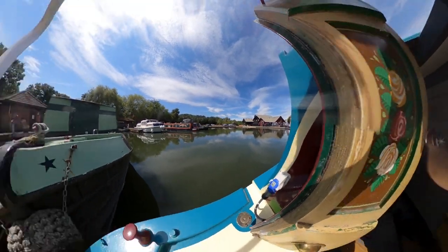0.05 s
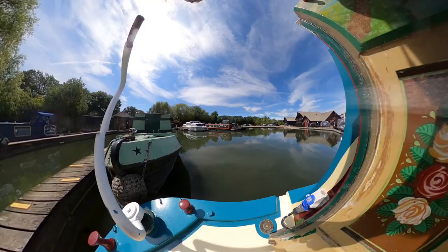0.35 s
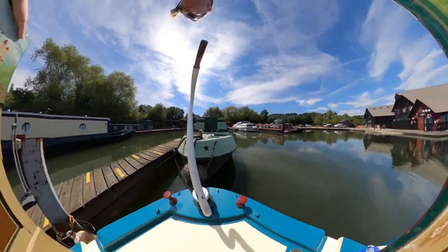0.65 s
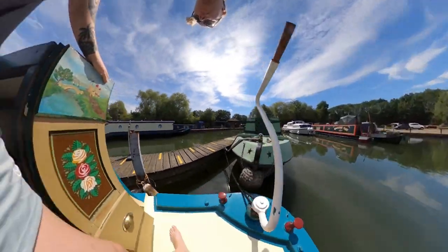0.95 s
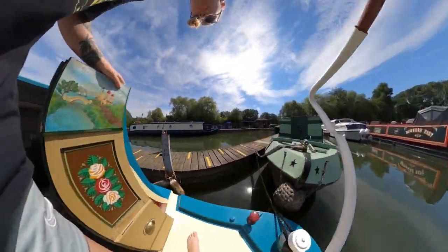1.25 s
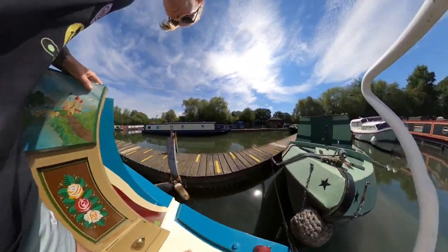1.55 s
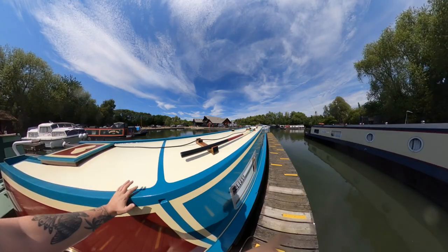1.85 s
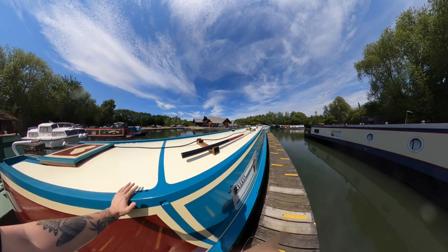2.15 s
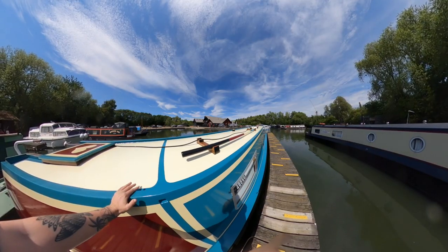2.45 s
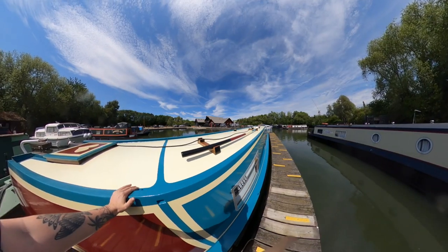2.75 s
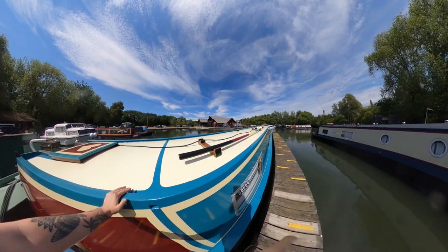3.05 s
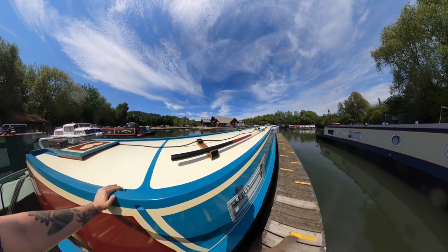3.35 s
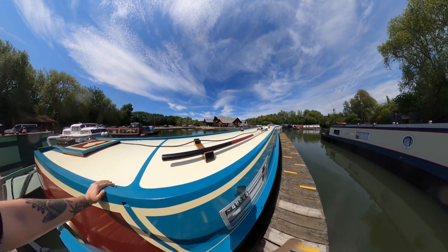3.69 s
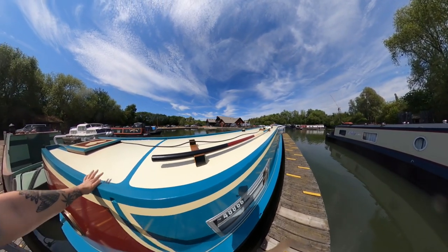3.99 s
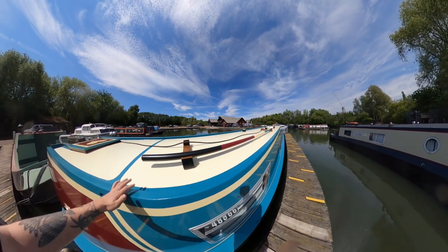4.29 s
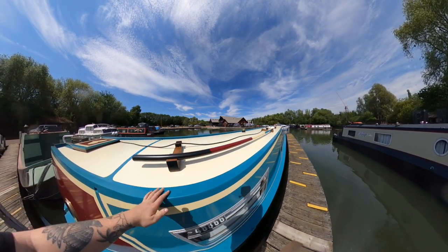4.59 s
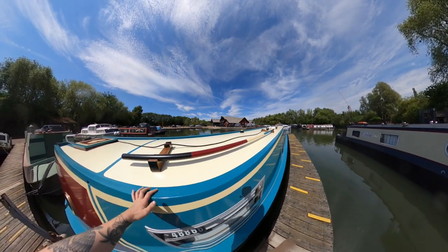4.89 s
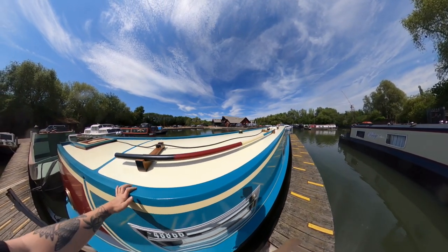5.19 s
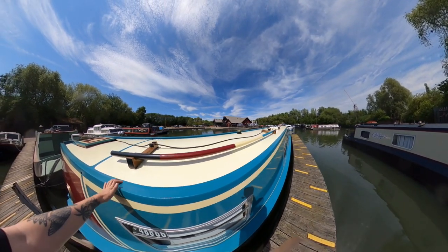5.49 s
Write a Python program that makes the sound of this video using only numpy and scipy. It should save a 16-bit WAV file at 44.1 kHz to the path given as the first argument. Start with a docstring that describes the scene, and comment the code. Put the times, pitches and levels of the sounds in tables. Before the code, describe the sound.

Wind rumbles on the microphone aboard a moored boat, over a soft wash of water and leaves. Close by, the hull takes a knock, and a wooden door clicks several times and squeaks once. A low idling engine hum comes up, and a small dog gives five short, hoarse yaps that echo across the water. Light handling bumps, scuffs and faint distant chirps fall between them.

```python
"""On a narrowboat in a marina, camera in hand. Wind and handling rumble on the microphone
over a wash of water and trees. Close by, the hull takes a knock, and a cabin door clicks and
squeaks once as its hinge sticks and slips. The hum of an idling boat engine, faint at first,
comes up abruptly, and a small dog yaps five times across the water, echoing off hulls and the
far bank. Between the later yaps, faint calls carry from far off."""
import sys
import numpy as np
from scipy import signal
from scipy.fft import rfft, irfft, next_fast_len
from scipy.io import wavfile
from scipy.ndimage import uniform_filter1d, map_coordinates

SR = 44100
rng = np.random.default_rng(int(sys.argv[2]) if len(sys.argv) > 2 else 0)


def wrap_up_sound(samples):
    """Save the sound to the file named by the first command line argument, as 16-bit audio."""
    columns = np.atleast_2d(samples).T
    # keep every value between -1 and 1, then stretch to whole-number steps
    tamed = np.clip(columns, -1, 1)
    steps = np.round(tamed * 32767).astype(np.int16)
    wavfile.write(sys.argv[1], SR, steps)


N = 243873
TIME = np.arange(N) / SR


def amp(db):
    """Decibels to gain."""
    return 10 ** (np.asarray(db) / 20)


def unit(x):
    """x scaled to rms 1."""
    return x / np.sqrt(np.mean(x ** 2) + 1e-20)


def ramp(x, length):
    """Rises from 0 to 1 as x goes from 0 to length."""
    return np.clip(x / length, 0, 1)


def curves(rows):
    """Each column after the first (time_s), joined by straight lines."""
    times, *columns = np.transpose(rows)
    return [np.interp(TIME, times, column) for column in columns]


def wobble(rate, size=N):
    """A smooth random curve with rate knots a second."""
    knots = rng.standard_normal(size // 8 + 8)
    return map_coordinates(knots, [np.arange(size) * rate / SR], mode="wrap")


def filtered(x, response):
    """x through a gain that depends on frequency."""
    size = next_fast_len(len(x) + 8192)
    return irfft(rfft(x, size) * response(np.fft.rfftfreq(size, 1 / SR)), size)[:len(x)]


def lowpass(x, hz, steepness=4):
    """x with its treble rolled off above hz."""
    return filtered(x, lambda f: 1 / (1 + (f / hz) ** steepness))


def coloured(x, points):
    """x through a curve of (freq_hz, gain_db) points, at rms 1."""
    hz, db = np.transpose(points)
    return unit(filtered(x, lambda f: amp(np.interp(np.log(f + 1), np.log(hz), db))))


def resonate(x, modes):
    """x through resonances of alternating sign: (centre_hz, width_hz, gain_db)."""
    return filtered(x, lambda f: sum(
        (-1) ** k * amp(db) * 1j * f * width / (hz * hz - f * f + 1j * f * width)
        for k, (hz, width, db) in enumerate(modes)))


def noise(points, size=N):
    """Coloured noise of rms 1."""
    return coloured(rng.standard_normal(size), points)


def patchy(x, depth_db, bands, frames):
    """x with random swells, each a few bands wide and a few frames long."""
    spectrum = signal.stft(x, nperseg=512)[2]
    swells = uniform_filter1d(rng.standard_normal(spectrum.shape), bands, 0)
    swells = unit(uniform_filter1d(swells, frames, 1))
    return signal.istft(spectrum * amp(depth_db * swells), nperseg=512)[1][:len(x)]


def add(track, start_s, sound):
    """Mix a sound into the track at start_s."""
    start = round(start_s * SR)
    sound = sound[max(-start, 0):]
    part = track[max(start, 0):][:len(sound)]
    part += sound[:len(part)]


def echoes(x, t60_s, gap_s):
    """Diffuse reflections, about as strong as x, that begin after a gap."""
    t = TIME[:SR // 2]
    tail = rng.standard_normal(len(t)) * amp(-60 * t / t60_s) * (t > gap_s)
    return signal.fftconvolve(x, tail / np.linalg.norm(tail))[:len(x)]


def buzz(hz, rough, jitter, jitter_rate, uneven, harmonics):
    """Pulses at a pitch, every third one stronger, mixed with noise that puffs once a cycle."""
    phase = 2 * np.pi * np.cumsum(hz * (1 + jitter * wobble(jitter_rate, len(hz)))) / SR
    pulses = sum(np.cos(k * phase) for k in range(1, harmonics + 1)) * np.sqrt(4 * hz / SR)
    pulses *= 1 + uneven * np.cos(phase / 3)
    puffs = unit(rng.standard_normal(len(hz)) * (1 + np.cos(phase)))
    return np.sqrt(1 - rough) * pulses + np.sqrt(rough) * puffs


def thump(hz, db, t60_s, sharpness):
    """A damped swing; more sharpness gives it a quicker start."""
    t = TIME[:SR // 3]
    onset = 1 - np.exp(-(sharpness * hz * t) ** 2)
    return amp(db - 60 * t / t60_s) * onset * np.sin(2 * np.pi * hz * t)


def wind():
    """Wind right on the microphone: slow gusty buffets and a lumpy rumble of eddies."""
    # course of the wind: time_s, relative_buffet_db, relative_rumble_db
    strength = [(0.0, -22, -23), (.2, -26.5, -33.5), (.45, -18, -27.5), (0.91, -18.5, -30),
                (1.49, -23, -30.5), (2.8, -14, -30), (3.53, -17, -30.5), (4.13, -14.5, -30.5),
                (4.47, -16.5, -30.5), (5.53, -12, -29)]
    # spectra of the two layers: freq_hz, gain_db
    buffet_colour = [(3, -22), (8, 1.5), (15, 8.5), (22, 12.5), (37, 12), (48, 4), (70, -5), (140, -69.5)]
    rumble_colour = [(40, -28), (72, 1.5), (95, -3.5), (125, -9), (185, -11.5), (330, -23.5), (600, -45.5),
                     (1300, -100)]
    buffet_db, rumble_db = curves(strength)
    gust_db = wobble(rate=4.5)
    buffets = amp(buffet_db + 3.5 + gust_db) * noise(buffet_colour)
    eddies = sum(noise(rumble_colour) * amp(3 * wobble(rate=22)) for _ in range(2))
    return buffets + amp(rumble_db + 5.5) * unit(eddies)


def marina():
    """All around, ripples and leaves make a restless wash under a fine hiss."""
    # course of the ambience: time_s, relative_wash_db, relative_hiss_db
    ambience = [(0.12, -46.5, -58), (1.59, -42.5, -49.5), (1.76, -41, -55), (2.39, -37, -51.5),
                (2.93, -40.5, -54), (3.57, -35.5, -49), (4.35, -40.5, -53), (4.48, -38.5, -49.5),
                (5.15, -40, -52)]
    # spectra of the two layers: freq_hz, gain_db
    wash_colour = [(220, -9), (400, 2.5), (830, -8), (1080, -2.5), (1600, -6.5), (2100, -8), (2900, -16.5),
                   (4200, -28), (7000, -67)]
    hiss_colour = [(2000, -31.5), (3300, -1), (4100, -2), (5200, 3.5), (6200, 0), (7600, -0.5),
                   (8200, -6.5), (9000, -14), (11500, -58.5)]
    wash_db, hiss_db = curves(ambience)
    wash = patchy(noise(wash_colour), depth_db=2.5, bands=6, frames=10)
    wash *= amp(1.2 * wobble(rate=90))
    hiss = noise(hiss_colour) * amp(hiss_db - 1.5 + 1.4 * wobble(rate=24.99))
    return unit(wash) * amp(wash_db + 1.5) + hiss


def engine():
    """An idling engine's firing tone and weaker machinery tones: faint, then abruptly louder."""
    # engine tones: firing_multiple, relative_db
    partials = [(1, 2), (1.6, -19.5), (1.79, -13.5), (2.7, -28.5)]
    firing_hz, waver_db = 63.04, 3.3
    faint_db, full_db, hum_rises_s, rise_length_s = -31.5, -15, 1.65, 0.087
    hum_db = faint_db + (full_db - faint_db) * ramp(TIME - hum_rises_s, rise_length_s)
    phase = 2 * np.pi * firing_hz * TIME
    hum = np.zeros(N)
    for multiple, db in partials:
        level = amp(db + waver_db * wobble(rate=8.7))
        hum += level * np.sin(multiple * (phase + 0.22 * wobble(rate=6.9)))
    return amp(hum_db) * unit(hum)


def scuffs():
    """Hand and shoes rub on boat and jetty: grainy noise swells and fades in a broad resonance."""
    # rubs: start_s, length_s, relative_db, centre_hz, width_hz
    rubs = [(-.04, 0.17, -36.5, 880, 1300), (0.363, 0.027, -33, 1080, 890), (0.395, 0.098, -41, 1350, 910),
            (1.529, 0.15, -49, 5500, 3500), (1.977, 0.32, -52, 5200, 1990), (2.075, 0.06, -37.5, 514, 200),
            (2.47, 0.15, -37, 495, 220), (2.546, 0.15, -40, 1550, 900), (2.96, 0.13, -35.5, 490, 280),
            (3.335, 0.07, -36.5, 1500, 810), (3.885, 0.075, -38, 2400, 1800),
            (4.769, 0.1, -38.5, 1250, 990), (4.804, 0.077, -33, 420, 261), (5.135, 0.043, -44, 4000, 1200)]
    out = np.zeros(N)
    for start_s, length_s, db, hz, width_hz in rubs:
        size = int(length_s * SR)
        grain = rng.standard_normal(size) * amp(2.5 * wobble(200, size))
        body = [(hz, width_hz, 0)]
        rub = unit(resonate(resonate(grain, body), body))
        add(out, start_s, amp(db + 1.5) * rub * np.hanning(size))
    return out


def door_clicks():
    """Close by, each contact rings the wooden door and rattles its fittings, with one rebound."""
    # contacts of door, fittings and hand: start_s, panel_db, panel_pitch_ratio, metal_db, t60_s
    contacts = [(0.058, -36, 1, -27, 0.0072), (.383, -19.5, 0.5, -47, 0.018),
                (0.7314, -17.5, 1, -29.5, 0.031), (.776, -27.5, 1, -53, 0.019),
                (0.9284, -16.5, 1, -23, 0.044), (1.360, -33.5, 0.96, -34, 0.042),
                (1.517, -43, 0.64, -18, 0.016), (2.606, -31, .9, -39, 0.014),
                (3.147, -31.5, 1.5, -35, 0.0077), (3.499, -31, 0.98, -58, 0.021),
                (3.907, -24.5, 1.1, -44, .03)]
    # modes of the door panel: pitch_hz, width_hz, relative_db
    panel_modes = [(827, 150, 3.5), (1764, 160, 8.5), (2812, 170, 5.5)]
    # spectrum of the metal fittings: freq_hz, gain_db
    metal_colour = [(1800, -39), (3000, -10), (4200, -8.5), (5300, 2.5), (6200, -3), (7600, 2.5),
                    (9000, -16), (13000, -62.5)]
    rebound_s, rebound_db = 0.014, -16
    out, t = np.zeros(N), TIME[:SR // 5]
    for start_s, panel_db, pitch_ratio, metal_db, t60_s in contacts:
        panel = np.zeros(len(t))
        for hz, width_hz, db in panel_modes:
            # a wandering phase blurs the mode to its width
            drift = np.cumsum(rng.standard_normal(len(t))) * np.sqrt(2 * np.pi * width_hz / SR)
            panel += amp(db) * np.sin(2 * np.pi * hz * pitch_ratio * t + drift)
        ring = amp(panel_db) * unit(panel) + amp(metal_db) * noise(metal_colour, len(t))
        strike = amp(-60 * t / t60_s)
        rebound = (t > rebound_s) * amp(rebound_db - 60 * np.abs(t - rebound_s) / t60_s)
        add(out, start_s, ring * (strike + rebound))
    return out + amp(-9.5) * echoes(out, t60_s=0.16, gap_s=0.0099)


def knock_and_bumps():
    """One hard knock rings the hull; dull bumps reach the microphone through hand and hull."""
    # modes of the hull: pitch_hz, level_db, t60_s
    hull_modes = [(575, 5.5, 0.0092), (211, 8.5, 0.018), (50, 8, 0.067)]
    # handling bumps: start_s, level_db, pitch_hz
    bumps = [(.612, 5.5, 49.7), (0.653, 4.5, 42.3), (0.693, 4.5, 65), (.705, -4, 170), (.727, -9.5, 269),
             (0.755, -0.5, 144), (.816, 6.5, 66.4), (1.384, 6.5, 24.8), (1.851, -13.5, 208),
             (2.252, -9.5, 193), (2.41, -12, 194), (2.579, -7.5, 175), (2.669, -0.5, 125.5),
             (2.742, 5, 38.3), (2.808, -7.5, 128), (2.894, -11, 149), (3.101, -2.5, 129), (3.524, -6, 179),
             (3.843, -6, 169), (3.894, -18, 340), (4.255, -11, 180), (4.715, -7.5, 142), (5.04, -10, 185),
             (5.49, -3, 130)]
    out = np.zeros(N)
    knock = sum(thump(hz, db, t60_s, sharpness=4) for hz, db, t60_s in hull_modes)
    add(out, start_s=0.0793, sound=knock)
    for start_s, db, hz in bumps:
        t60_s = 0.071 * (98 / hz) ** 0.38  # higher bumps die sooner
        add(out, start_s, thump(hz, db, t60_s, sharpness=4 if hz < 100 else 2))
    return out


def hinge():
    """The door's hinge scrapes loose, slips regularly in a falling squeak and coasts to a stop."""
    start_s, length_s, scrape_s = 0.9265, 0.15, 0.035
    attack_s, release_s, squeak_t60_s = 0.0049, 0.05, 0.089
    first_hz, settled_hz, slowing_s = 972, 685, 0.034
    scrape_db, squeak_db, coast_db = -22, -14, -38
    # spectrum of the hinge: freq_hz, gain_db
    hinge_colour = [(320, -66), (560, -26), (720, -0.5), (1050, -2), (1540, 5.5), (2350, -1), (3100, -10.5),
                    (3950, -17.5), (4400, -30), (7900, -21), (9000, -36), (12000, -71)]
    t = TIME[:int(length_s * SR)]
    slip_hz = settled_hz + (first_hz - settled_hz) * np.exp(-t / slowing_s)
    free = (1 + np.tanh((t - scrape_s) / 0.0027)) / 2  # 0 scraping, 1 slipping freely
    rough = 0.7 * (1 - free) + 0.15 * free
    slips = buzz(slip_hz, rough, jitter=0.012, jitter_rate=322, uneven=0.16, harmonics=13)
    slips *= amp(0.5 * wobble(260, len(t)))  # the slips grip unevenly
    bright = coloured(slips, hinge_colour)
    coasting = ramp(t - 0.033, 0.024)  # the treble goes as it coasts
    tone = (1 - coasting) * bright + coasting * lowpass(bright, hz=2500)
    squeak_level = amp(squeak_db - 60 * np.maximum(t - scrape_s, 0) / squeak_t60_s) + amp(coast_db)
    level = (1 - free) * amp(scrape_db) + free * squeak_level
    level *= ramp(t, attack_s) * ramp(length_s - t, release_s)
    out = np.zeros(N)
    add(out, start_s, tone * level)
    return out + amp(-5.5) * echoes(out, t60_s=0.16, gap_s=0.005)


def throat(folds, formants_hz, progress):
    """The dog's three throat resonances sink as its mouth closes, late in the yap."""
    # the three resonances: width_hz, gain_db
    resonances = [(240, -1.5), (150, 1), (224, -4.5)]
    # pitch that each loses with the mouth shut: sink_share
    sink = [.2, 0.033, .1]
    # colour of the mouth and the distance: freq_hz, gain_db
    carry = [(250, -25), (560, -5.5), (720, 7), (1000, 2.5), (2200, -1.5), (2600, -8.5), (3100, -14.5),
             (6000, -30)]
    closes_from = 0.53  # share of the yap
    closing = ramp(progress - closes_from, 1 - closes_from)
    voice = np.zeros(len(folds))
    for shut in (0, 0.5, 1):  # crossfade open, half-shut and shut
        centres_hz = np.array(formants_hz) * (1 - shut * np.array(sink))
        modes = [(hz, width_hz, db) for hz, (width_hz, db) in zip(centres_hz, resonances)]
        weight = np.sqrt(1 - ramp(np.abs(closing - shut), 0.5))
        voice += weight * coloured(resonate(folds, modes), carry)
    return voice


def dog():
    """Hoarse yaps across the water: the vocal folds arch in pitch, and the closing mouth dulls them."""
    # yaps: start_s, length_s, relative_db, top_hz, droop_share, noise_share,
    # formant1_hz, formant2_hz, formant3_hz, relative_treble_db
    yaps = [(1.716, .13, -17.5, 329.9, .2, 0.33, 950, 1680, 2550, -5),
            (2.296, 0.13, -17, 327.7, .34, 0.68, 1026, 1526, 2490, -6.5),
            (3.504, 0.143, -21.5, 348.1, 0.11, 0.48, 1026, 1820, 2630, 0),
            (4.381, .125, -18, 366.3, .28, 0.35, 1045, 1746, 2430, -4.5),
            (5.213, 0.16, -22, 333.4, 0.11, 0.35, 985, 1670, 2370, -4)]
    top, attack, release = 0.363, 0.36, 0.51  # shares of the yap
    out = np.zeros(N)
    for start_s, length_s, db, top_hz, droop, rough, *formants_hz, treble_db in yaps:
        progress = np.linspace(0, 1, int(length_s * SR))
        scoop = 0.0604 * ramp(top - progress, top) ** 2
        sag = droop * ramp(progress - top, 1 - top) ** 1.394
        pitch_hz = top_hz * (1 - scoop - sag)
        folds = buzz(pitch_hz, rough, jitter=0.022, jitter_rate=160, uneven=0.55, harmonics=10)
        folds *= amp(2 * wobble(131.3, len(folds)))  # the voice catches and surges
        folds += amp(-6) * echoes(folds, t60_s=0.06, gap_s=0.003)  # nearby hulls smear it
        voice = throat(folds, formants_hz, progress)
        low = lowpass(voice, hz=1400, steepness=12)
        mouth_db = -0.5 - 11.5 * progress
        yap = unit(low) + amp(treble_db + mouth_db) * unit(voice - low)
        effort_db = -16 * (1 - ramp(progress, attack)) - 18 * (1 - ramp(1 - progress, release))
        add(out, start_s, yap * amp(db + effort_db) * signal.windows.tukey(len(yap), 0.1))
    return out


def across_water(direct):
    """A sound arrives with a slap off a neighbouring hull, then echoes of boats and the far bank."""
    slap = np.zeros(N)
    add(slap, start_s=0.044, sound=amp(-8.5) * lowpass(direct, hz=1800))
    boats = amp(-19.5) * echoes(direct, t60_s=0.28, gap_s=0.042)
    far_bank = amp(-23) * echoes(direct, t60_s=0.3, gap_s=0.12)
    return direct + slap + boats + far_bank


def far_calls():
    """Brief wavering calls from far over the water, blurred by distance."""
    # calls: start_s, length_s, level_db, pitch_hz
    calls = [(2.623, 0.044, -36.5, 1355), (3.259, 0.053, -38, 2053), (3.348, 0.03, -39, 1375),
             (4.084, 0.028, -38, 1146), (4.776, 0.026, -33.5, 1290)]
    waver_share = 0.044
    out = np.zeros(N)
    for start_s, length_s, db, hz in calls:
        size = int(length_s * SR)
        phase = 2 * np.pi * np.cumsum(hz * (1 + waver_share * wobble(150, size))) / SR
        add(out, start_s, amp(db) * unit(np.sin(phase)) * np.hanning(size))
    return out + amp(-6) * echoes(out, t60_s=0.3, gap_s=0.015)


def scene():
    """Everything as it reaches the one microphone on the boat."""
    yapping = across_water(dog())
    close_by = hinge() + door_clicks() + scuffs() + knock_and_bumps()
    return (yapping + close_by + engine() + wind() + marina() + far_calls())[None]


def record(dry):
    """A faint narrow ring colours the hiss; the camera rounds off peaks and dulls the top octave."""
    ring_hz, dull_hz, band_limit_hz, fade_s = 7920, 9300, 15800, 0.004
    with_ring = dry[0] + resonate(dry[0], [(ring_hz, 28, 1.8)])
    rounded = with_ring / (1 + np.abs(with_ring) ** 12) ** (1 / 12)
    faded = rounded * ramp(TIME, fade_s) * ramp(TIME[-1] - TIME, fade_s)
    dulled = filtered(faded, lambda f: 1 / np.sqrt(1 + (f / dull_hz) ** 16))
    return filtered(dulled, lambda f: f < band_limit_hz)[None]


dry = scene()
out = record(dry)
wrap_up_sound(out)
```